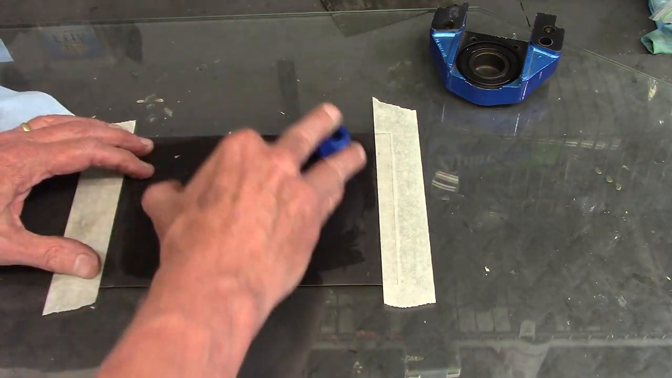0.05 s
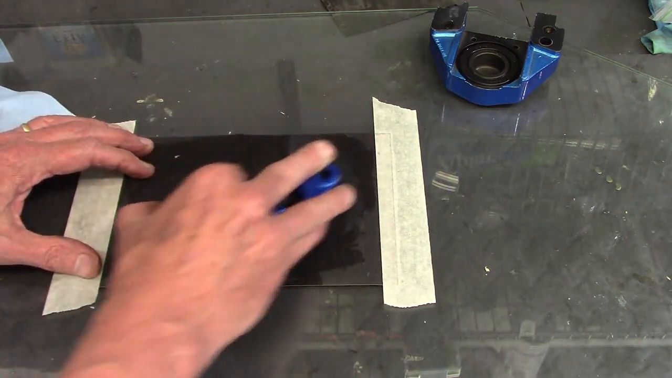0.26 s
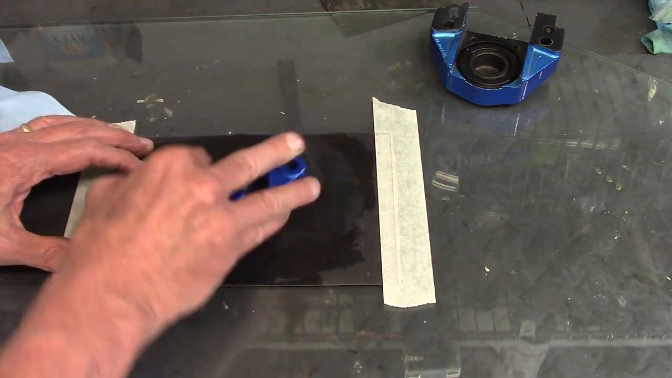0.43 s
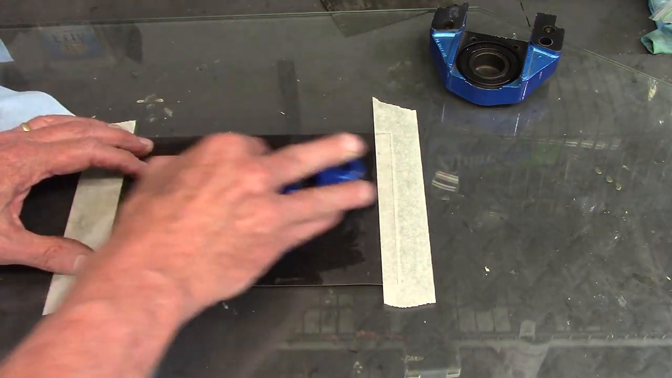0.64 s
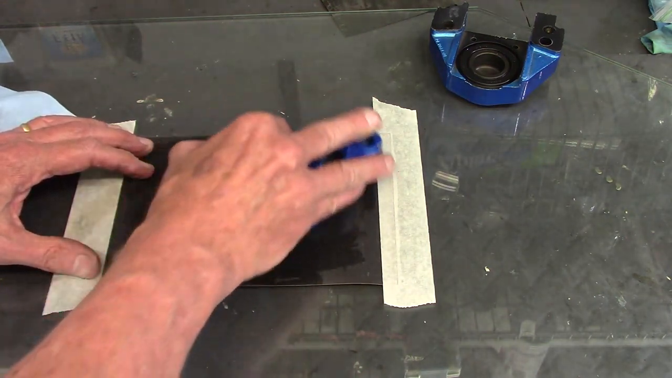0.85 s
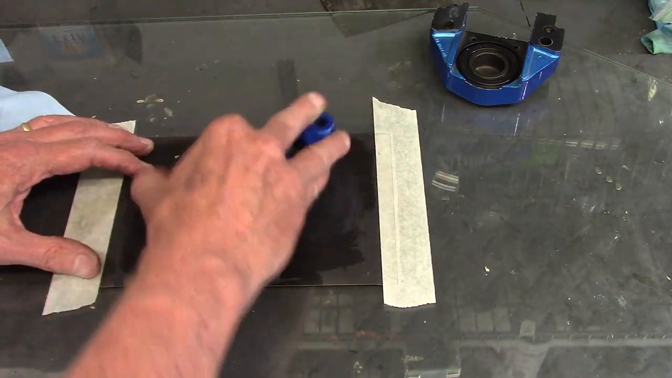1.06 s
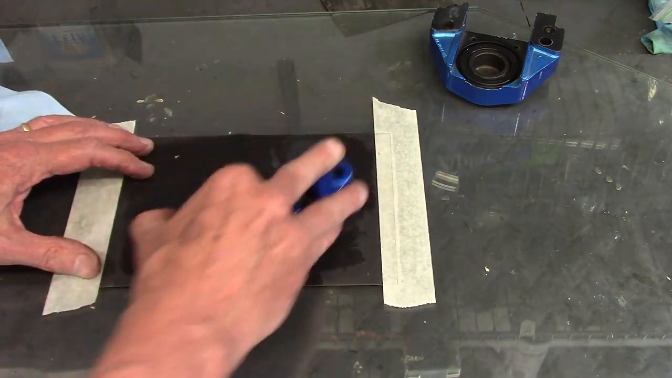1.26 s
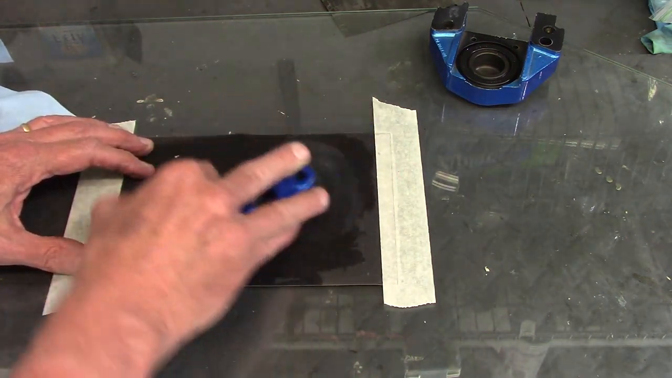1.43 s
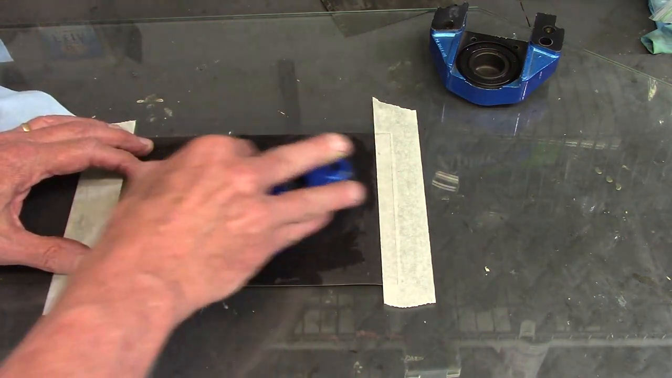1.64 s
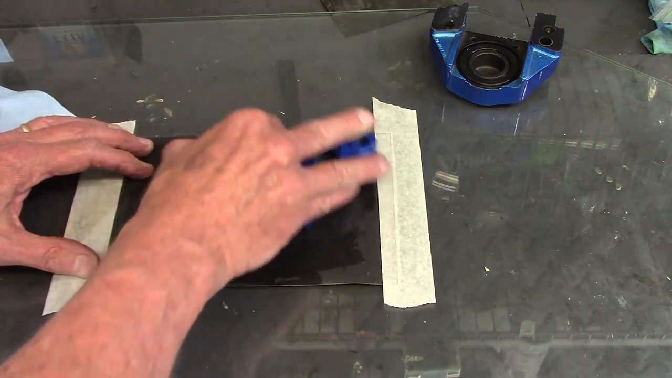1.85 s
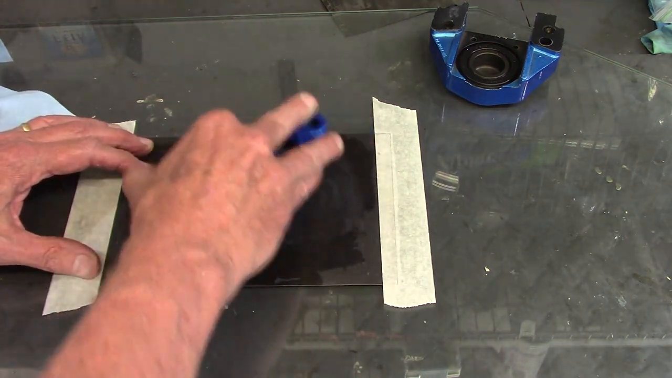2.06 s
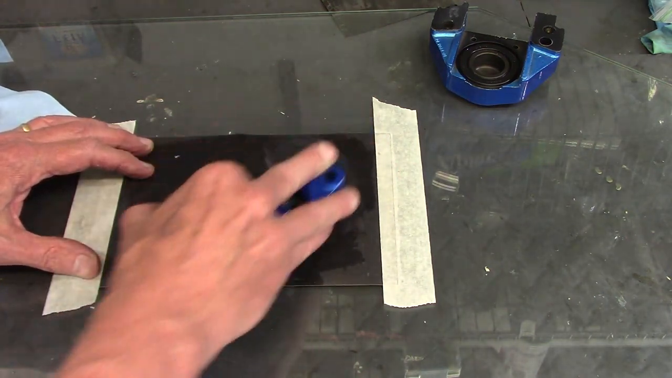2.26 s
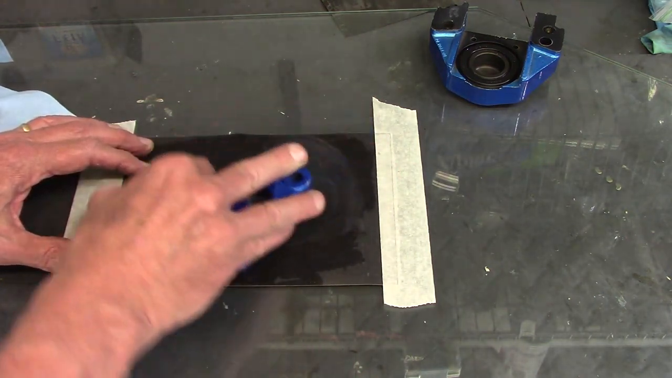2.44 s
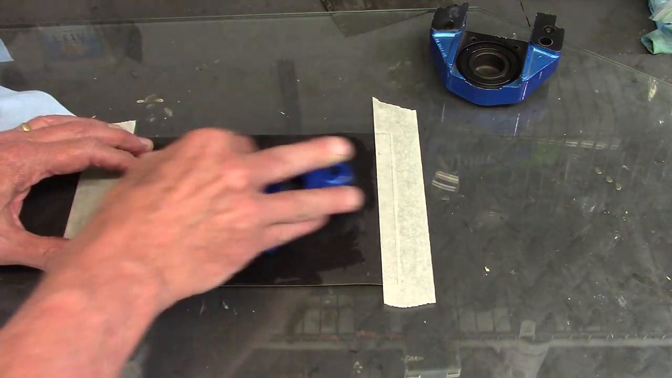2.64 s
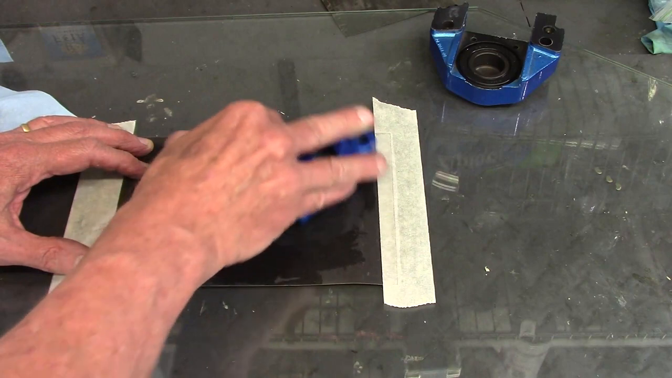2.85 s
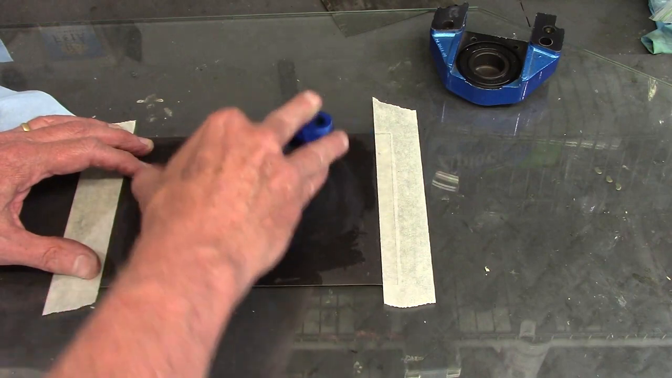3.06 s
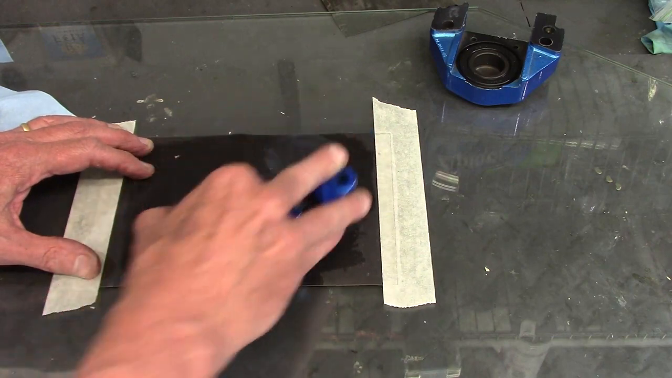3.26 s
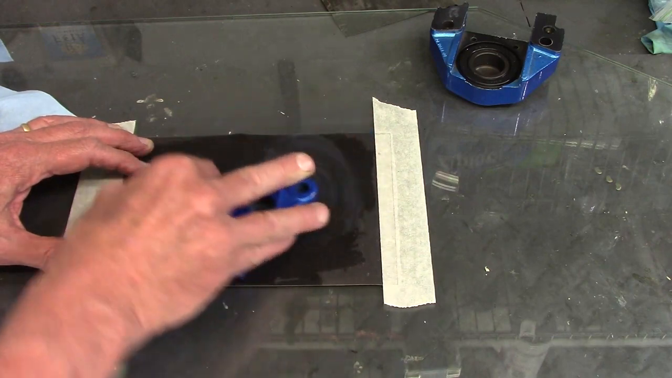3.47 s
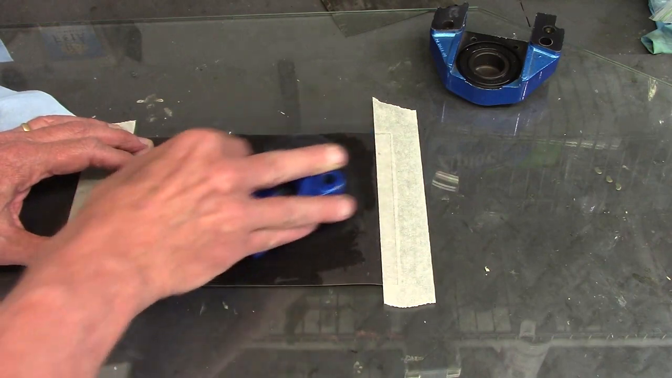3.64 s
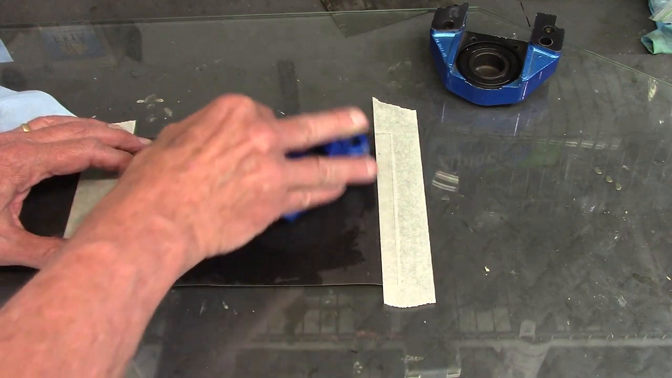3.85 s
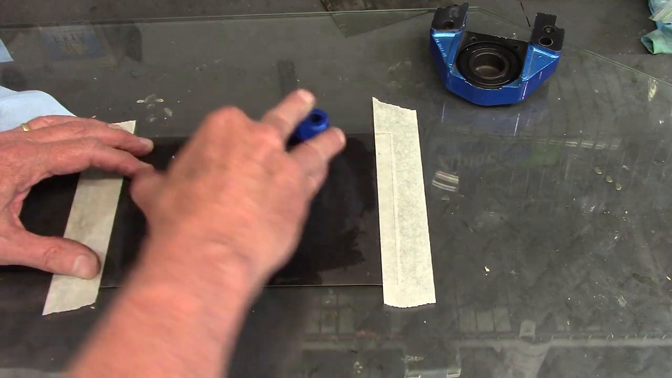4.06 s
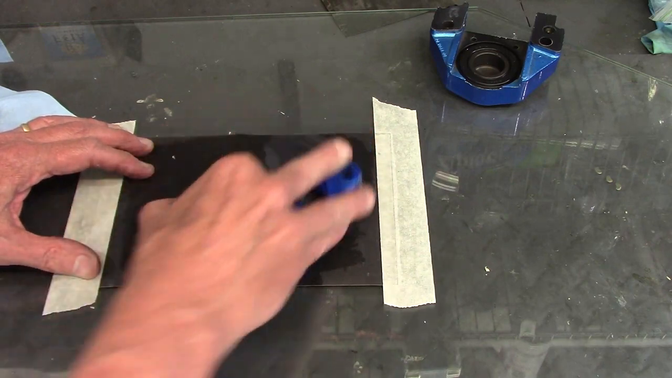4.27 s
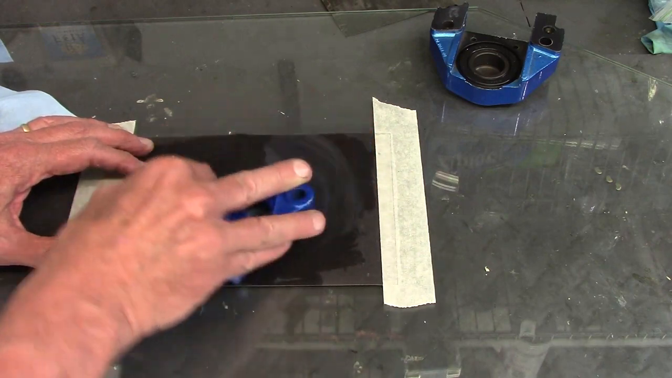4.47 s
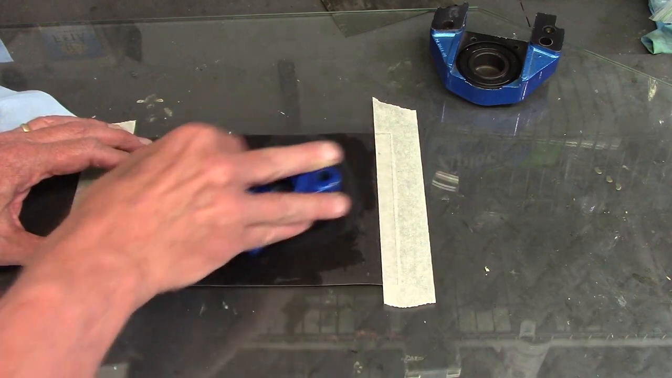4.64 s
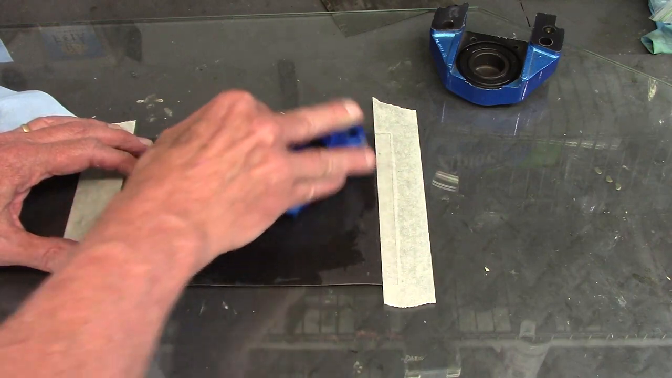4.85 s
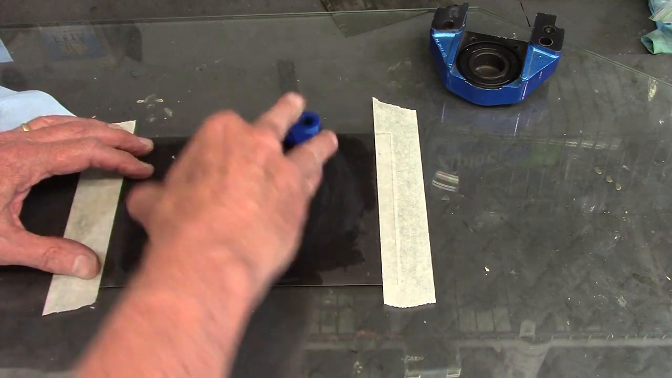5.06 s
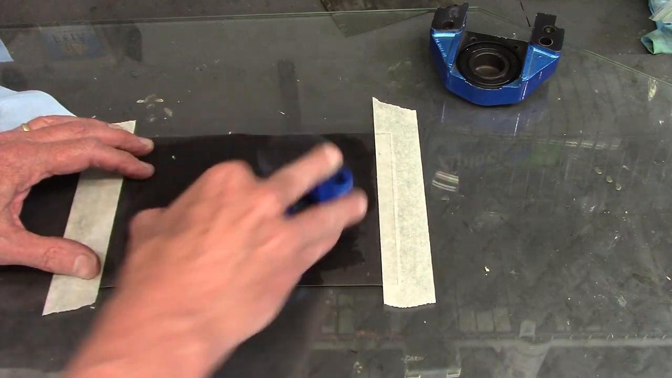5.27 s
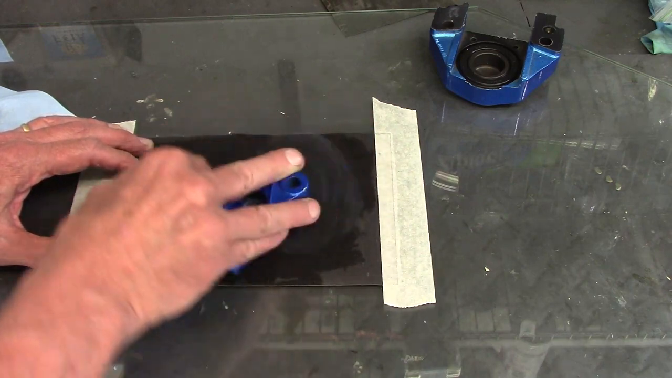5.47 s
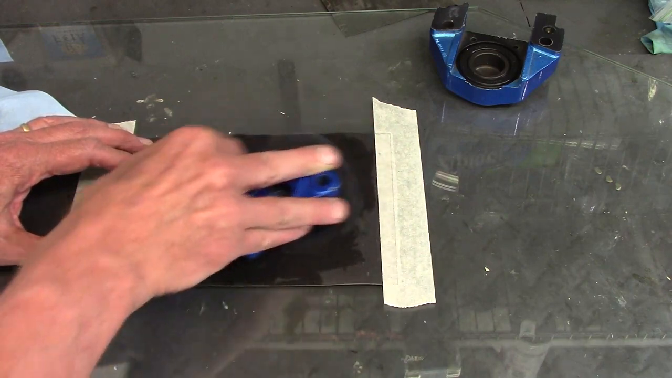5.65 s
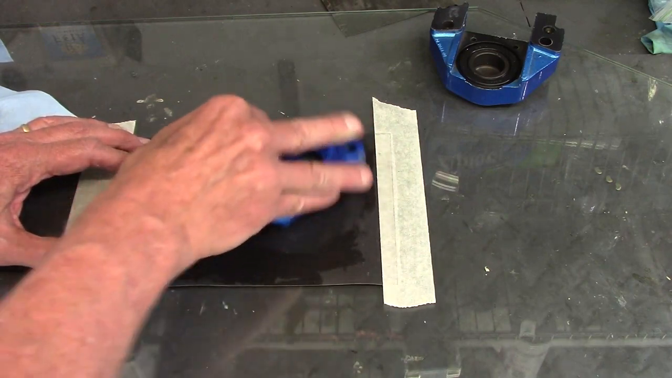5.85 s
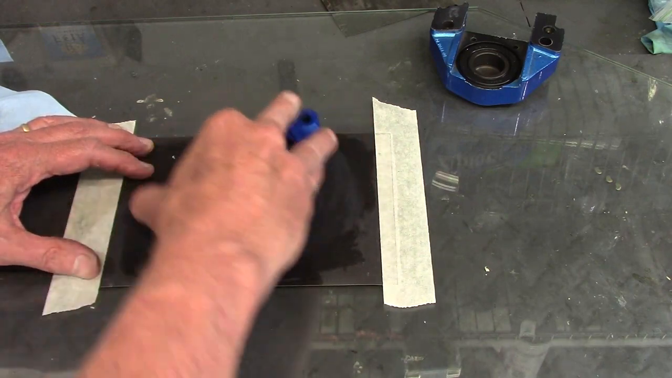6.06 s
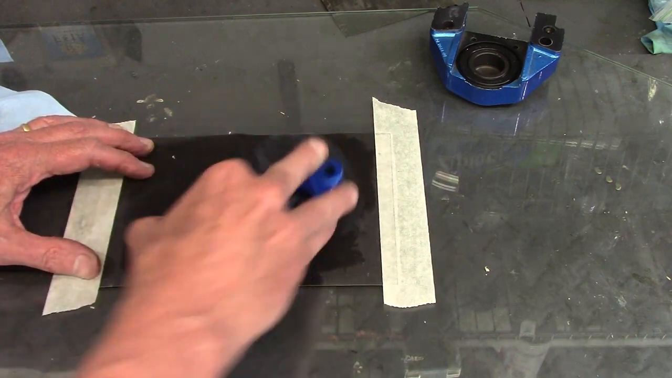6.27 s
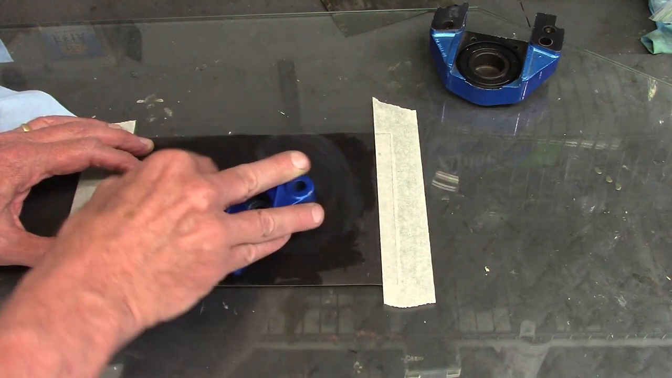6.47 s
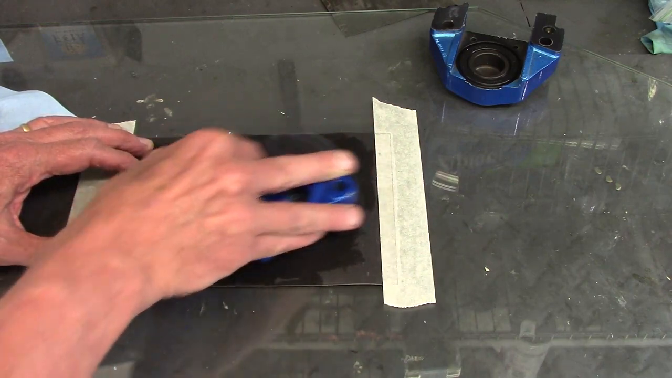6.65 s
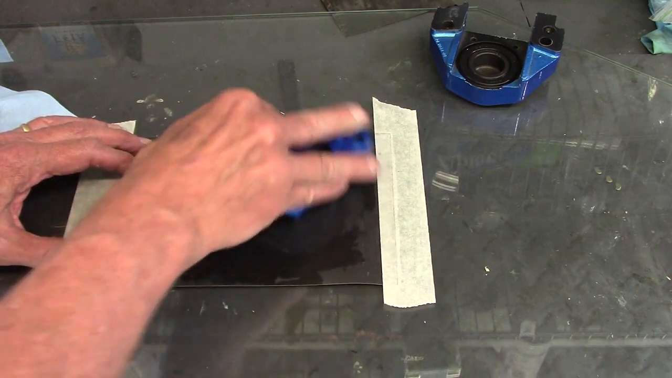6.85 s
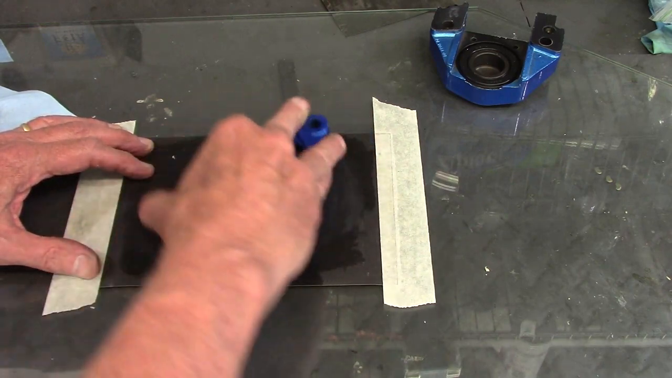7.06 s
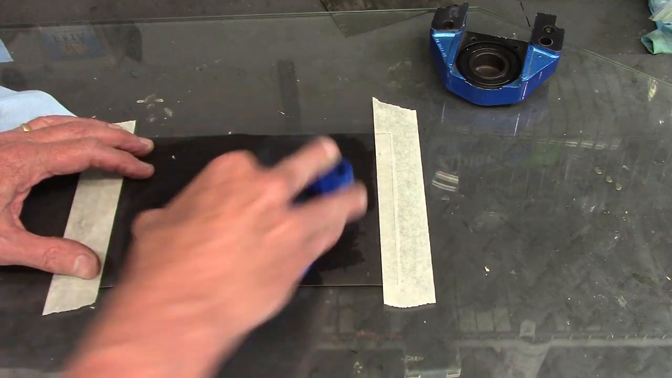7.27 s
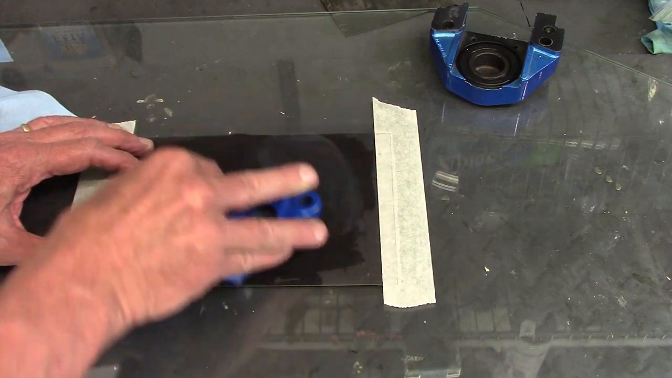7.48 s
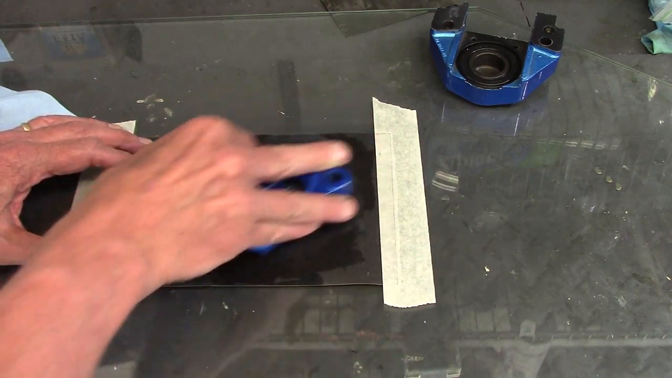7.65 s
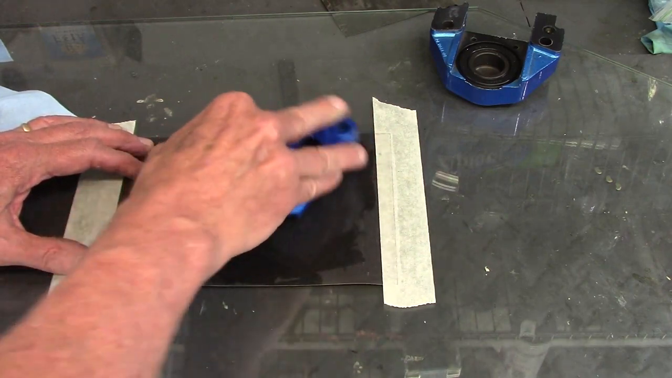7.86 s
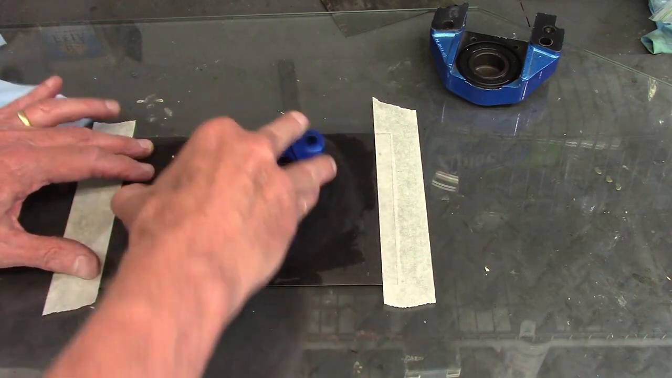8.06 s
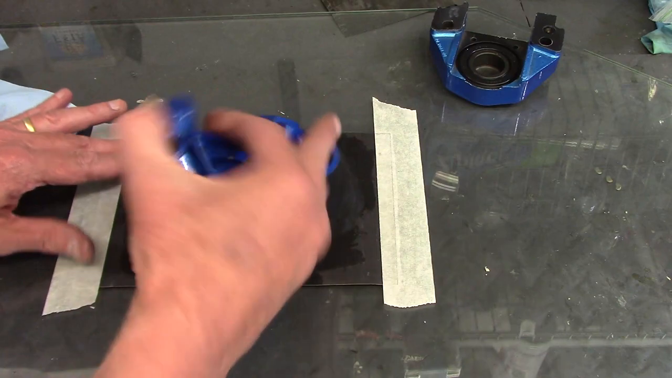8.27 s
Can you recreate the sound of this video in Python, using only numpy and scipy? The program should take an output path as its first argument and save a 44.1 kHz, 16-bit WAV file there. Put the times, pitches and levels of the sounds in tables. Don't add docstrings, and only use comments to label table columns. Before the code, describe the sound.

Close up in a workshop, a hand laps a metal part over wet sandpaper on a glass plate. The coarse, bright scrape is continuous from the start, dipping slightly at each bend of its one-second loops. Near eight seconds it jerks with a tiny squeal and stops; a short plate hum, room tail and faint wet crackle follow over low rumble.

```python
import sys
import numpy as np
from scipy import signal
from scipy.io import wavfile
from scipy.ndimage import uniform_filter1d

SR = 44100
rng = np.random.default_rng(int(sys.argv[2]) if len(sys.argv) > 2 else 0)


def volts(x):
    e = np.asarray(x, float) / 20
    return 10 ** e


def store_wav(level_fs):
    pcm = np.round(np.clip(np.atleast_2d(level_fs), -1, 1) * 32767)
    wavfile.write(sys.argv[1], SR, pcm.T.astype(np.int16))


N = 366471
LOOP_S = 1.0026
EDGE_HZ = 15740


def evened(x):
    return x / np.sqrt(np.mean(x ** 2) + 1e-20)


def read(points, hz):
    f, value = np.transpose(points)
    return np.interp(np.log(hz + 1), np.log(f + 1), value)


def bell(x, middle, half_width):
    return np.exp(-((x - middle) / half_width) ** 2)


def grit(per_s, spread_db):
    size = volts(spread_db * np.minimum(rng.exponential(1, N), 3.5))
    sign = rng.choice([-1, 1], N)
    caught = rng.random(N) < per_s / SR
    return evened(size * sign * caught)


def patches(hz, t, bins, frames):
    field = rng.standard_normal((len(t), len(hz)))
    smooth_in_time = uniform_filter1d(field, frames, 0)
    return evened(uniform_filter1d(smooth_in_time, bins, 1)).T


# time in seconds, pressure in dB, tilt towards the treble in dB,
# weight on the plate in dB.
GRIP = [(0, -20.5, -1.5, 0), (.45, -20.5, 0, 0), (.9, -20.5, 0, 0), (1.35, -20.5, 0.5, 0),
        (1.8, -20.5, 0.5, 0), (2.3, -20.5, 0.5, 0), (2.75, -20.5, 0, 0), (3.2, -20.5, 0, 0),
        (3.7, -20.5, 0.5, -1), (4.15, -21, 1, -0.5), (4.6, -20.5, -0.5, 0), (5.1, -20.5, 0, 0.5),
        (5.55, -20.5, -0.5, 0), (6.0, -20.5, 0, 0), (6.5, -20.5, 0, 0), (6.95, -21.5, -0.5, 0),
        (7.4, -21, 0, 0), (7.96, -21.5, -2, 0)]
# time in seconds, change of speed in dB,
# half length in seconds, rock onto the plate in dB.
BENDS = [(0.16, -3.5, .07, -0.5), (0.47, -4.5, 0.043, 2), (0.732, -6, 0.081, 0), (.98, -2.5, 0.072, 0),
         (1.224, -2.5, .06, 0), (1.518, -4.5, .05, 2), (1.748, -4.5, 0.062, -0.5), (2.0, -4.5, 0.039, 0),
         (2.242, -2, .06, -0.5), (2.508, -5.5, .04, 2), (2.756, -4.5, 0.07, 0), (2.97, -2.5, 0.12, 1),
         (3.25, -2, 0.065, 0.5), (3.51, -5, 0.04, -1), (3.746, -1.5, 0.055, 0), (3.97, -4, 0.034, -0.5),
         (4.218, -3.5, 0.065, 0.5), (4.452, -4, 0.043, 0), (4.75, -4, 0.04, -0.5), (4.958, -3, 0.066, -1.5),
         (5.22, -4, 0.061, -1.5), (5.492, -6.5, 0.053, 0), (5.77, -6, 0.044, 1), (5.967, -5, 0.04, 0.5),
         (6.226, -5.5, 0.045, 1), (6.475, -7.5, 0.059, -0.5), (6.72, -1.5, .05, 1.5),
         (7.167, -3.5, 0.062, 1), (7.5, -3, .05, 2), (7.725, -5.5, .035, -0.5)]
# time in seconds, contact in dB, squeal of the part in dB.
JERK = [
    (7.97, 0, 1),
    (7.993, -3.5, 5),
    (8.005, -3.5, 13),
    (8.022, -6.5, 16),
    (8.034, -9, 10),
    (8.048, -12, 9),
    (8.062, -18, 5.5),
]
# level under the pressure in dB, wear in dB per
LAYERS = [(-7, -0.13, -0.18, .8, -.6), (-6, -0.33, 0.18, 1.1, -.3), (-4.5, 0.11, 0.5, .3, .3),
          (-4.5, 0.35, 1.17, 0.1, .9)]
# once-a-loop swell in dB, its place in turns,
# twice-a-loop swell in dB, its place in turns.
PLACES = [(.4, 0.55, 1.5, .36), (0.5, 0.42, .5, 0.22), (0.7, 0.21, 0.6, 0.082), (-0.1, 1, .2, .09)]
LET_GO = [1.2, 0.76, .98, 1.25]


def layers(t):
    s, press_db, tilt_db, weight_db = np.transpose(GRIP)
    speed_db = sum(db * bell(t, when, half) for when, db, half, _ in BENDS)
    rock_db = sum(db * bell(t, when, half) for when, _, half, db in BENDS)
    jerk_s, contact_db, squeal_db = np.transpose(JERK)
    lost_db = np.interp(t, jerk_s, contact_db)
    turns = t / LOOP_S
    out = []
    for layer, place, share in zip(LAYERS, PLACES, LET_GO):
        db, wear, fast, rock, tilt = layer
        once_db, once, twice_db, twice = place
        place_db = once_db * np.cos(2 * np.pi * (turns - once))
        place_db = place_db + twice_db * np.cos(4 * np.pi * (turns - twice))
        hand_db = np.interp(t, s, press_db + tilt * tilt_db + rock * weight_db)
        hand_db = hand_db + fast * speed_db + rock * rock_db
        wear_db = wear * (t - N / SR / 2)
        out.append(db + wear_db + place_db + hand_db + share * lost_db)
    out[2] = out[2] + np.interp(t, jerk_s, squeal_db)
    return np.array(out)


# frequency in Hz, level in dB.
SCRAPE = [(150, -30.5), (290, -23.5), (435, -19.5), (480, -6), (1000, -6), (1400, -9), (2250, -13),
          (3200, -11.5), (4000, -10), (5500, -12.5), (7500, -12), (9000, -14), (12000, -17.5),
          (16000, -20.5)]
# frequency in Hz, width in Hz, height over the scrape
# (or notch) in dB, swing per loop in dB, place in the loop in turns.
RINGS = [(373, 37, 6, -0.5, 1), (460, 76, 1.5, 1.5, 0.43), (628, 48, 3.5, 0.5, 0.39),
         (700, 64, -10, 4, 1), (785, 230, 1, 0.5, 0.86), (1120, 117, 4, 1, 0.27),
         (1312, 67, 3, 3.5, 0.34), (1362, 75, -4.5, 3.5, .9), (1544, 86, 3, -0.5, 0.15),
         (1670, 83, 7, 0, 0.74), (1878, 160, 7.5, 0.5, 0.51), (1956, 96, 5.5, 2, 0.52),
         (2090, 49, 2, 1, 0.35), (1744, 52, -3.5, -0.5, .22),
         (2470, 200, 6, 0.5, 0.28), (2840, 84, 2, 1.5, 0.14), (3090, 53, 3, 2.5, 0.21),
              (3420, 126, 3.5, 0.5, 0.55), (3737, 160, 5, 1.5, 0.37), (4000, 85, -3, -4, 0.25),
              (4255, 210, 3, 0.5, 0.2), (4580, 217, 6, 1.2, 0.26), (4840, 170, 4, 0, 0.33),
              (5130, 110, 2, 0.5, 0.69), (6060, 145, 4, 1.5, 0.083), (6490, 220, 3, 2.5, 0.68),
              (7040, 120, 2, 2.5, 0.49), (9300, 980, 0.5, 1.5, 0.79)]
# frequency in Hz where boom, plate ring, part ring and fizz rule.
SHARE_HZ = [800, 1850, 3900, 9500]
# time in seconds,
# half length in seconds, frequency in Hz, half width in Hz, change in dB.
FLARES = [(0.048, .08, 3150, 300, 6), (.15, .15, 9300, 1200, -1), (2.097, 0.1, 4550, 300, 2.5),
          (3.1, .07, 13800, 1500, 2), (3.75, .06, 13500, 4000, -4), (3.9, 0.095, 9400, 1200, 4),
          (4.6, .12, 9050, 1500, -0.5), (5.05, .11, 3570, 700, 6.5), (5.06, .08, 13500, 3500, 0),
          (5.353, .07, 4600, 500, 1), (6.07, 0.049, 3440, 500, 7), (6.85, 0.12, 9200, 2000, 2),
          (7.2, 0.11, 4320, 300, 3.5), (7.8, .05, 9600, 1200, 2.5), (7.922, 0.053, 4580, 300, 8.5),
          (.05, .08, 1850, 500, 2.5), (.14, 0.074, 4100, 1300, -2.5), (1.68, .07, 1800, 500, -1.5),
          (2.4, .1, 1850, 500, 1), (3.82, 0.12, 900, 500, 3), (6.1, 0.042, 900, 600, -1),
          (6.797, .04, 1850, 500, 2.5), (6.94, 0.064, 4000, 1500, -2.5), (7.362, .05, 9500, 5000, -2.5)]


def scrape():
    s = np.arange(0, JERK[-1][0], .004)
    bands_db = layers(s)
    press_db = 10 * np.log10(sum(volts(db) ** 2 for db in bands_db))
    now = np.arange(N) / SR
    lifted = np.clip((s[-1] - now) / .012, 0, 1)
    strikes = grit(per_s=16000, spread_db=2.0) * volts(np.interp(now, s, press_db) + 0.29) * lifted
    hz, t, z = signal.stft(strikes, SR, nperseg=2048, noverlap=1536)

    colour = volts(read(SCRAPE, hz))[:, None] ** 2
    for f, width, db, swing_db, place in RINGS:
        height = volts(db + swing_db * np.cos(2 * np.pi * (t / LOOP_S - place))) ** 2
        colour = colour * (1 + (height - 1) / (1 + (2 * (hz[:, None] - f) / width) ** 2))
    for one, db in zip(np.eye(4), bands_db - press_db):
        share = read(list(zip(SHARE_HZ, one)), hz)
        change_db = np.interp(t, s, db - np.median(db))
        colour = colour * volts(np.outer(share, change_db)) ** 2
    for when, length, f, width, db in FLARES:
        flare = np.outer(bell(hz, f, width), bell(t, when, length))
        colour = colour * volts(db * flare) ** 2
    colour = colour / colour[hz < EDGE_HZ].sum(0) * len(hz)

    echoes_db = 1.8 * patches(hz, t, bins=3, frames=30)
    patchy_db = 0.67 * patches(hz, t, bins=14, frames=8) + 0.43 * patches(hz, t, bins=120, frames=3)
    z = z * np.sqrt(colour) * volts(echoes_db + patchy_db)
    return signal.istft(z, SR, nperseg=2048, noverlap=1536)[1][:N]


# frequency in Hz, level in dB, t60 in seconds.
PLATE = [(329, -10, .5), (441, -5, .7), (483, -2.5, 0.6), (540, -3, .5), (636, -6, .5)]


def lift():
    start = round(8.003 * SR)
    out, t = np.zeros(N), np.arange(N - start) / SR
    for hz, db, t60 in PLATE:
        out[start:] += volts(db - 35 - 60 * t / t60) * np.sin(2 * np.pi * (hz * t + rng.random()))
    out[start:] *= 1 - np.exp(-t / .008)
    return out


# time in seconds, peak in dB.
PEEL = [
    (8.1648, -24.5),
]


def peel():
    out, t = np.zeros(N), np.arange(1200) / SR
    band = signal.butter(2, [3500, 13500], "band", fs=SR)
    for s, db in PEEL:
        puff = rng.standard_normal(len(t)) * bell(t, .012, .005)
        start = round((s - .009) * SR)
        out[start:start + len(t)] += volts(db - 12) * signal.lfilter(*band, puff)
    return out


# frequency in Hz, t60 in seconds, level in dB.
ROOM = [(250, .7, -14), (480, 1, -7), (900, 0.85, -12.5), (1700, 0.45, -10.5), (2800, 0.5, -9),
        (4300, 0.36, -13.5), (6500, 0.45, -11.5), (10000, 0.39, -12), (16000, .3, -17)]


def room(x):
    hz, t, z = signal.stft(x, SR, nperseg=512, noverlap=384)
    f, t60, db = np.transpose(ROOM)
    keep = volts(-120 * t[1] / read(list(zip(f, t60)), hz))
    power = np.array([signal.lfilter([0, 1 - k], [1, -k], p) for k, p in zip(keep, abs(z) ** 2)])
    a, b = rng.standard_normal((len(t), len(hz), 2)).T
    wet = volts(read(list(zip(f, db)), hz))[:, None] * np.sqrt(power) * (a + 1j * b)
    return signal.istft(wet, SR, nperseg=512, noverlap=384)[1][:N]


# frequency in Hz, level in dB per Hz.
RUMBLE = [(15, -17), (29, -4), (45, -7), (70, -14.5), (88, -14), (110, -18.5), (132, -17.5), (240, -26.5),
          (450, -19), (800, -33), (1500, -33.5), (3000, -46), (7000, -48), (16000, -52)]
# time in seconds, half length in seconds, swell in dB.
JOLTS = [(.3, 0.19, 5), (.96, .05, 4), (1.25, .12, 4), (1.85, .12, 5), (2.4, .12, 5.5), (3.12, .07, 6),
         (3.5, .17, 5), (4.22, .1, 5), (4.52, .1, 3), (5.03, 0.11, 4), (5.28, .06, 6), (5.55, .3, 4),
         (6.48, .08, 6), (7.17, 0.15, 9.5), (7.49, .08, 5.5), (7.97, .12, 4), (8.3, .2, 4)]
# frequency in Hz, level in dB.
HUM = [(29.3, -38), (129, -59)]


def workshop():
    hz, t, z = signal.stft(rng.standard_normal(N), SR, nperseg=8192)
    shake_db = -1.5 + sum(db * bell(t, s, half) for s, half, db in JOLTS)
    swell_db = np.outer(hz < 120, shake_db)
    z = z * volts(read(RUMBLE, hz)[:, None] + swell_db)
    rumble = evened(signal.istft(z, SR, nperseg=8192)[1][:N])
    waver = evened(uniform_filter1d(uniform_filter1d(rng.standard_normal(N), 4000), 4000))
    speed = 1 + 0.0625 * waver
    hum = sum(volts(db + 3.5) * np.sin(2 * np.pi * np.cumsum(f * speed) / SR) for f, db in HUM)
    return volts(-37.5) * rumble + hum


def scene():
    work = scrape() + lift() + peel()
    mono = volts(-0.8) * work + room(work) + workshop()
    return np.array([mono, mono])


# time in seconds, limit under the strongest in dB.
STARVED = [(.2235, -7.5), (.2665, -7.5), (3.808, -6), (5.343, -7), (7.158, -8), (7.839, -8)]


def thinned(mid, hz, t):
    for (s, db), luck in zip(STARVED, rng.random((len(STARVED), len(hz)))):
        level = np.sqrt(abs(mid) ** 2 @ bell(t, s, .02))
        spared = volts(9 * luck[(hz // 260).astype(int)] ** 3)
        treble = hz > 1200
        lost = treble & (level * spared < volts(db) * level[treble].max())
        mid = mid * (1 - .93 * np.outer(lost, bell(t, s, .0115)))
    return mid


# time in seconds, middle frequency in Hz.
SPLIT = [(.192, 7650), (.632, 7600), (.632, 9000), (.796, 8300), (.796, 12100), (.957, 14500),
         (2.238, 7000), (2.792, 9000), (2.792, 13100), (3.072, 4900), (3.072, 6200), (3.072, 12100),
         (3.164, 11300), (3.164, 4850), (3.234, 8950), (3.63, 5800), (3.642, 9200), (3.654, 12450),
         (3.742, 13200), (4.213, 6600), (4.371, 4900), (4.371, 6300), (5.372, 6950), (5.625, 9700),
         (5.625, 11800), (5.971, 8400), (6.835, 7650), (6.88, 9750), (7.112, 9000), (7.319, 9000)]


def flecked(mid, hz, t):
    side = np.zeros_like(mid)
    for s, f in SPLIT:
        weight = np.outer(abs(hz - f) < 760, bell(t, s, .008))
        side = side + volts(3) * weight * np.roll(mid, 40, axis=1)
        mid = mid * (1 - 0.37 * weight)
    return mid, side


def roll_off(x):
    return signal.sosfilt(signal.butter(12, 16990, fs=SR, output="sos"), x)


def record(dry):
    hz, t, mid = signal.stft(dry.mean(0), SR, nperseg=512, noverlap=384)
    mid, side = flecked(thinned(mid, hz, t), hz, t)
    both = signal.istft(np.array([mid + side, mid - side]), SR, nperseg=512, noverlap=384)[1][:, :N]
    both = both + volts(-72.5) * rng.standard_normal(dry.shape)
    edge = signal.firwin(1023, EDGE_HZ, window=("kaiser", 10), fs=SR)
    return roll_off(signal.oaconvolve(both, edge[None], "same"))


dry = scene()
out = record(dry)
store_wav(out)
```